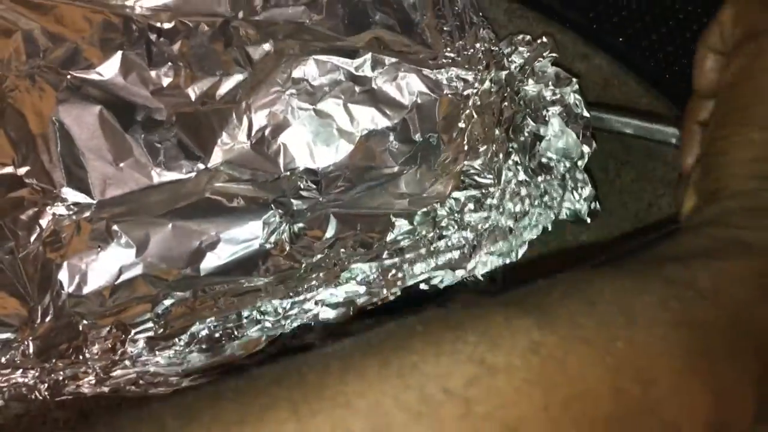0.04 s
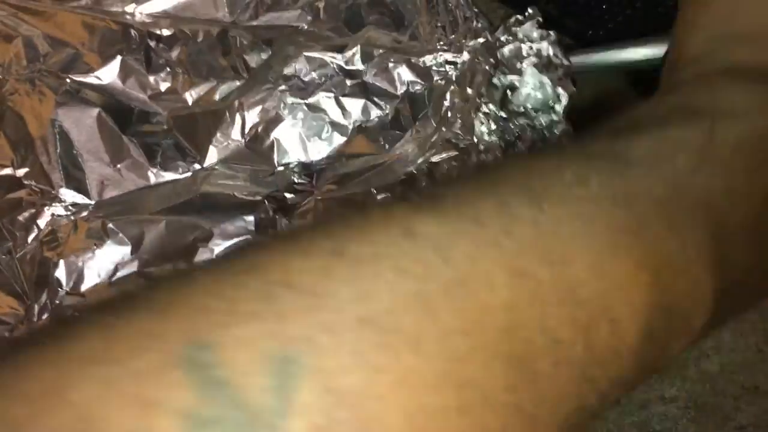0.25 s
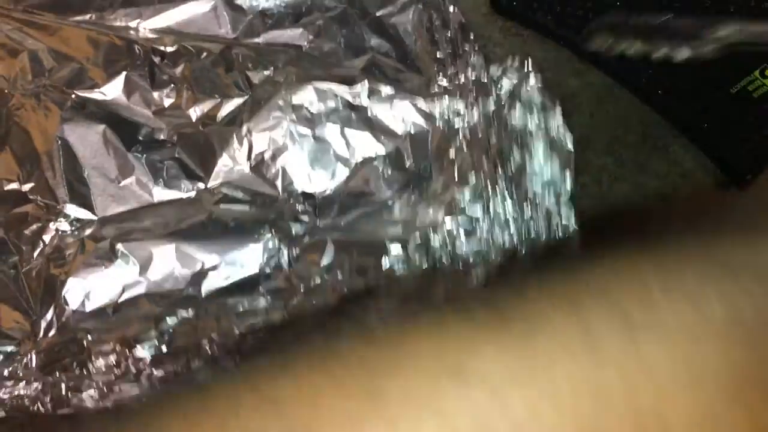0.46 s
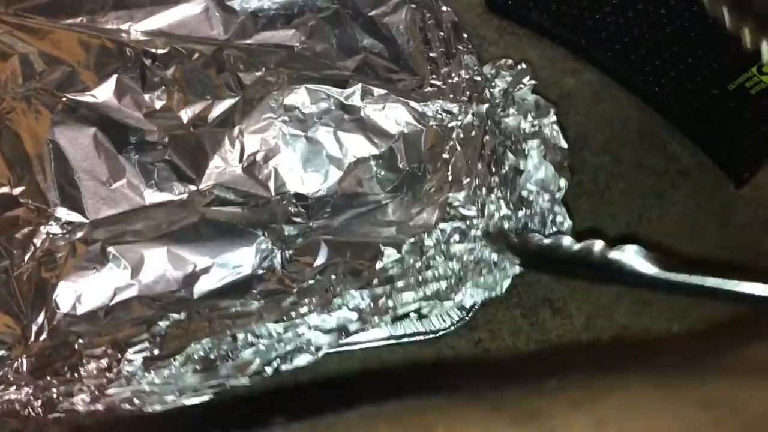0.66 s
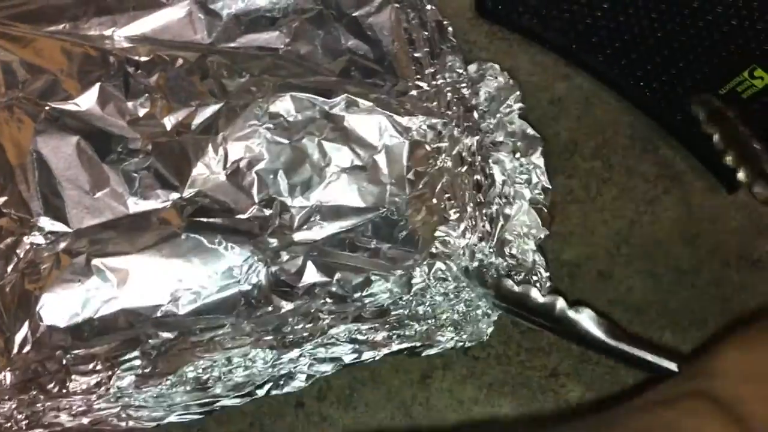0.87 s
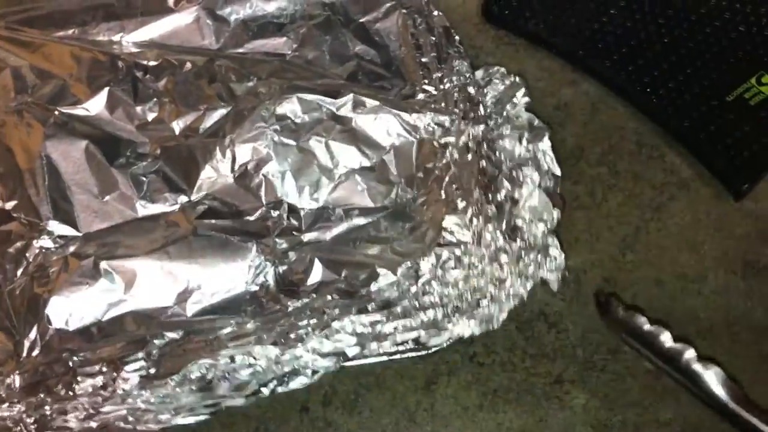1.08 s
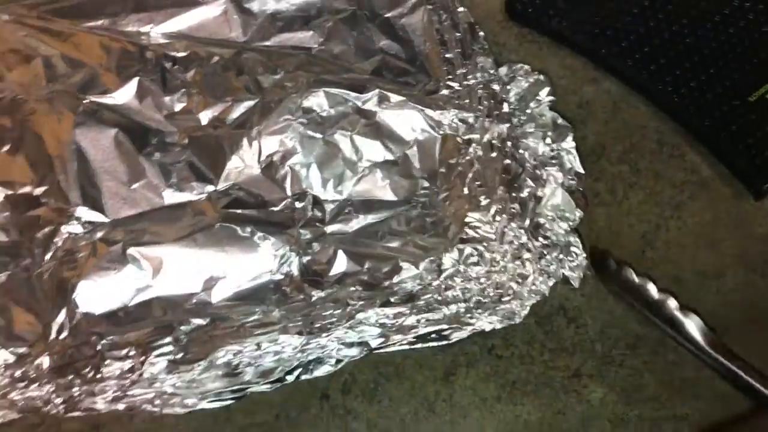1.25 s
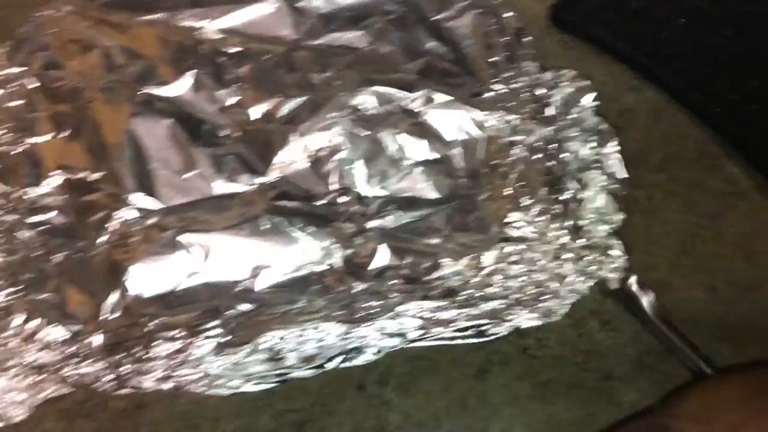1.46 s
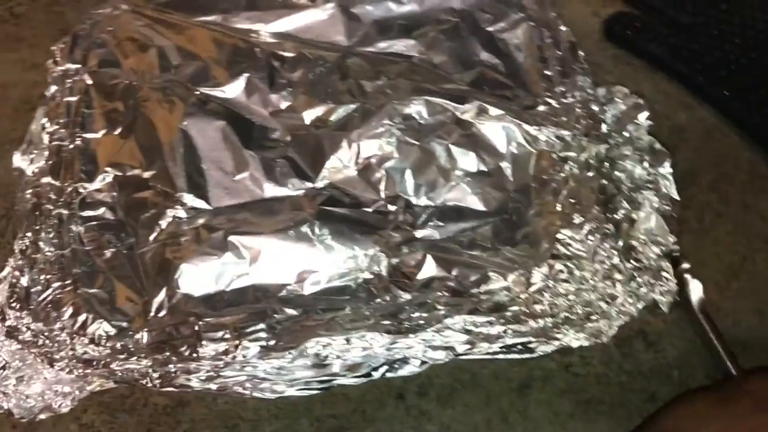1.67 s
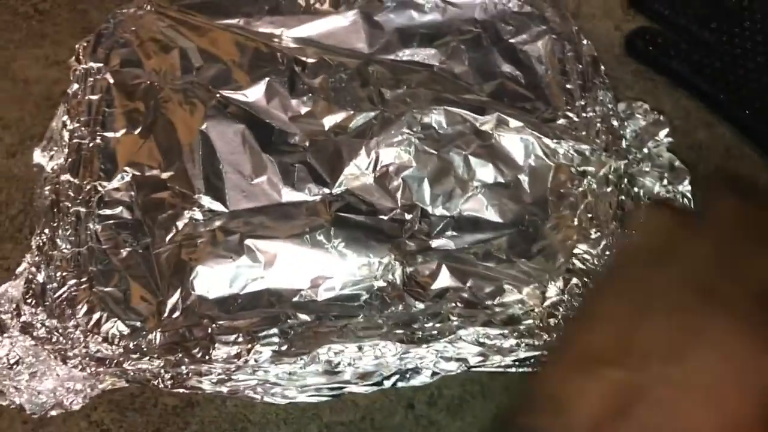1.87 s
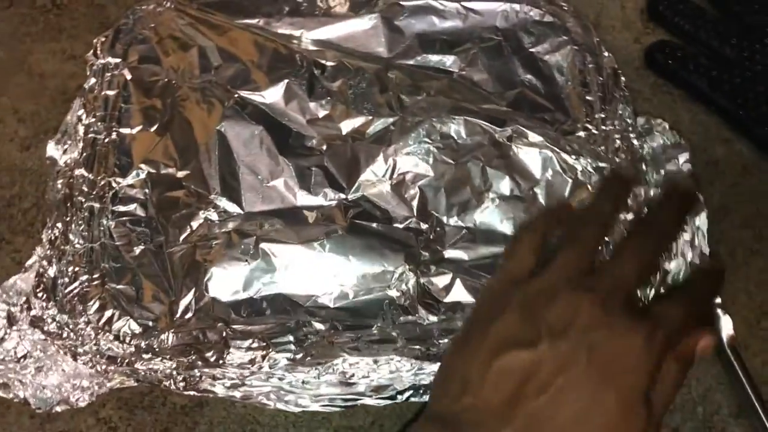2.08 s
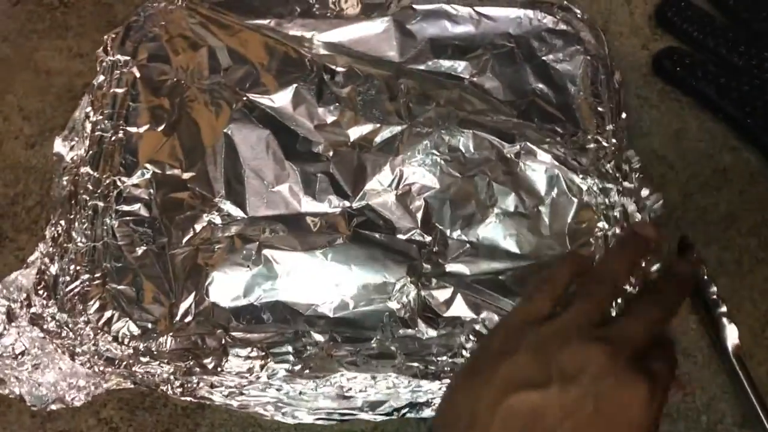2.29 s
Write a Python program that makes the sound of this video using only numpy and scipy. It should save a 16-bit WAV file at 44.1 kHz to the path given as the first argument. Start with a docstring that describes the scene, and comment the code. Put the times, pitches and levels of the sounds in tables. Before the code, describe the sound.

Foil crackling and snapping as it is tucked, followed by a table knife being set down.

```python
"""Tucking foil round a pan

Kitchen counter, close up, one microphone. A table knife tucks aluminium foil under the rim of a thin
foil pan: each push buckles it into tiny crinkles and a few sharper snaps, and the pan gives with a
hollow pop. The knife is set down: it knocks, slides and drops with a short ring. Then fingers press
the foil. Quiet room tone lies behind it all."""
import sys
import numpy as np
from scipy import signal
from scipy.fft import rfft, irfft
from scipy.io import wavfile

SR = 44100
rng = np.random.default_rng(int(sys.argv[2]) if len(sys.argv) > 2 else 0)


def to_wav(s):
    """Save 16-bit WAV."""
    ch = np.atleast_2d(s).T  # columns
    pcm = np.round(np.clip(ch, -1, 1) * 32767)  # PCM
    wavfile.write(sys.argv[1], SR, pcm.astype(np.int16))


N = 102973
T = np.arange(N) / SR

# Pushes on the foil, one list each: t/s, crinkle level/dB, treble above body/dB
PUSHES = [
    [(0, -40, -1), (.028, -42, 1), (.045, -57.5, -19), (.15, -59.5, -3), (.18, -61, -14)],
    [(.21, -54, -16), (.238, -50.5, -1), (.26, -42, -2.5), (.30, -37.5, -1.5), (.318, -43, 7.5),
     (.345, -43, 6), (.40, -44, 8), (.46, -44.5, 7.5), (.479, -44, 5.5), (.49, -57, -16), (.56, -53, -6),
     (.63, -59.5, -14)],
    [(.722, -49, 12), (.75, -39, -4), (.778, -47, -5.5), (.805, -40.5, -4.5), (.83, -54, -14),
     (.848, -54, -10), (.88, -53.5, -12), (.92, -44.5, -9), (.945, -64, -11), (.965, -54, 5)],
    [(1.0, -44.5, -11), (1.018, -35.5, 1), (1.04, -42, 2.5), (1.059, -32.5, 3.5), (1.068, -47, -13),
     (1.10, -53, -8), (1.13, -72, -12), (1.2, -87, -5)],
    [(2.085, -56.5, -1), (2.115, -53, 0), (2.15, -52.5, -2), (2.21, -58, 1), (2.25, -54, 2),
     (2.275, -46, -5.5), (2.30, -53.5, 0), (2.335, -56.5, -5)],
]
# Low cut per push, thinner the looser the foil lies on the pan: f/Hz
PUSH_LOW_CUTS = [149, 200, 478, 380, 220]
# Creases snapping through: t/s, level/dB, length/s, treble above body/dB, facet f/Hz, facet level/dB
SNAPS = [(.0018, -28.5, 0.0024, -3.5, 1340, -28), (0.013, -39, 0.0024, -8, 2440, -41),
         (0.03, -37.5, 0.0021, -7, 4430, -43), (0.21, -55, 0.0023, 3, 6900, -55),
         (0.3238, -31, 0.0066, -5, 1290, -27.5), (.3245, -36, 0.0039, -8, 2440, -30.5),
         (0.5327, -40, 0.00096, 6, 3250, -44), (0.555, -49, 0.0037, -4, 910, -44),
         (0.598, -54, .002, 5, 5000, -60), (0.658, -53, .002, 2, 3180, -53),
         (0.7229, -39, .002, 3, 1110, -49), (0.7299, -38.5, 0.0037, 5, 6570, -35),
         (0.745, -42, .003, 3, 2360, -43), (0.8105, -35.5, 0.0018, 2.5, 1090, -42),
         (.8272, -48, 0.0023, 9, 3500, -52), (0.853, -38.5, .002, 2, 3620, -46),
         (.886, -50, 0.0043, 4, 1420, -48), (0.899, -47, 0.0027, 3, 3160, -44),
         (0.9107, -47, 0.0032, 3, 3400, -41), (0.9678, -32, 0.0039, 4, 1150, -37),
         (0.975, -29.5, .002, 1, 6430, -39), (1.0309, -33, 0.0057, 8.5, 3440, -36),
         (1.0378, -39, 0.0034, 6, 802, -35), (1.09, -51, .002, -3, 6200, -55),
         (1.167, -53, .004, 4.5, 5400, -58), (2.1, -47.5, 0.0051, -12, 960, -43.5),
         (2.11, -52, .002, -3, 3530, -57), (2.162, -43, .003, 4.5, 6140, -52),
         (2.1937, -43, 0.0022, -5, 1270, -50)]
# Spectrum of buckling foil: f/Hz, level/dB
FOIL_SPECTRUM = [(59, -42), (100, -13), (188, -12.5), (355, 0), (438, -4.5), (808, -2), (956, -2.5),
                 (1290, -4), (1840, -7.5), (2470, -5.5), (2990, -9), (3540, -6.5), (4750, -10.5),
                 (6260, -9.5), (7250, -13), (8580, -12), (15500, -21.5)]
# The pan wall gives: t/s, level/dB
PAN_FLEXES = [(.003, -30.5), (.26, -33), (.29, -54), (.324, -31), (.555, -48), (.816, -32.5), (.978, -35.5),
              (2.166, -42.5), (2.275, -51)]
# The pan shifts under the long push: t/s, level/dB
PAN_RUMBLE = [(.2, -64), (.34, -57.5), (.45, -61), (.56, -53.5), (.66, -84)]
# Knife on counter: t/s, thud/dB, crack/dB, chatter length/s, ring/dB, clang/dB, boom/dB
KNOCKS = [(1.4286, -16, -22.5, 0.0041, -45.5, -42, -31), (1.458, -31, -51, 0.00087, -70, -60, -43),
          (1.5681, -23, -33, 0.0018, -53, -47, -37.5), (1.71, -24.5, -17.5, 0.0062, -34, -23, -36),
          (1.7178, -22.5, -36, 0.0017, -45, -46, -22.5), (1.7514, -27, -30, 0.0046, -53, -32.5, -33),
          (1.768, -34.5, -39, .002, -69, -48, -33)]
# The handle drags: t/s, level/dB
SLIDE = [(1.44, -29), (1.47, -39), (1.52, -40.5), (1.555, -52), (1.59, -40), (1.63, -44), (1.675, -44),
         (1.705, -39), (1.72, -59)]
# Modes of pan, blade and counter: f/Hz, level re the hit/dB, t60/s
PAN_MODES = [(247, -5.5, 0.1), (309.5, -7, 0.11), (364.5, -1.5, 0.13), (480, -11.5, .1), (583, -14, 0.092),
             (810, -14.5, 0.11)]
KNIFE_MODES = [(2518, -4, 0.13), (3170, -9, 0.19), (3465, -2, .18), (3760, -1, .16), (4770, 3, 0.19),
               (5280, -7.5, 0.4), (5905, -1, .22), (6330, 2, 0.22), (6345, -9, 0.45), (8750, 2, 0.15),
               (11900, -4, .06), (13900, -6, .11)]
COUNTER_MODES = [(135.2, -13, 0.15), (182.7, -22, 0.48), (302, -4.5, 0.094), (358, -7.5, 0.077),
                 (474.5, -14.5, 0.2), (581.6, -15, 0.17), (920, -21, 0.14), (1193, -26, 0.35),
                 (1482, -26.5, 0.34)]
# Spectra of pan rumble, counter thud, knife crack, handle drag and room tone: f/Hz, level/dB
RUMBLE_SPECTRUM = [(45, -2), (70, -8), (130, -1.5), (250, -8.5), (600, -7), (1500, -34)]
THUD_SPECTRUM = [(90, -19), (140, -3), (200, -4), (300, 3.5), (450, -0.5), (620, 1), (1000, -2.5),
                 (1400, -6.5), (1900, -11.5), (2600, -7), (5000, -23), (15000, -45)]
CRACK_SPECTRUM = [(500, -21), (1900, -20.5), (2600, -2.5), (3600, 1), (4500, -3.5), (6100, 3), (7300, -4.5),
                  (8800, -1), (10000, -7), (12000, -3), (15500, -7)]
SLIDE_SPECTRUM = [(35, -45), (60, -22), (156, -1), (602, 2), (1630, -9.5), (1910, -11.5), (2330, -14),
                  (4330, -27), (5900, -20.5), (8230, -39), (12000, -35), (15600, -68), (22000, -120)]
ROOM_TONE_SPECTRUM = [(15, -28), (25, -11), (75, -1.5), (173, -11), (209, -14.5), (289, -15), (552, -23.5),
                      (1570, -23), (2490, -27), (10400, -33.5), (11500, -36), (15500, -35)]
# Decay of the kitchen: f/Hz, t60/s
ROOM_T60 = [(100, 0.37), (500, 0.48), (2000, 0.44), (5000, 0.4), (10000, 0.31), (16000, 0.23)]

CLICKS_PER_S, CLICK_SPREAD_DB, CLUMP_DB, CLUMPS_PER_S = 6000, 3.5, 1.5, 150
TREBLE_HZ, SNAP_LOW_CUT_HZ, TOP_CUT_HZ = 3150, 555, 15800
SNAP_RELEASE_S, FACET_RELEASE_S, PAN_ATTACK_S = 0.0021, 0.0043, 0.0031
THUD_RELEASE_S, CRACK_RELEASE_S, STRIKE_ATTACK_S = 0.0064, 0.0027, 0.00049
CLANG_HZ, CLANG_Q = 3590, 5.4   # the blade
BOOM_HZ, BOOM_DECAY_S = 86.5, 0.0096   # the counter top gives under a knock
FOIL_ROOM_DB, KNIFE_ROOM_DB, ROOM_TONE_DB = -12.5, -11, -59.5
EARLY_DB, EARLY_DECAY_S, TAIL_RISE_S = -6.5, .008, 0.0088
MOVES_PER_S = 2.478   # how fast the reflections change as the hand moves


def foil():
    """Crinkles come in clumps under each push; snaps are tight bursts of the same buckling."""
    crinkles = unit(clicks() * amp(CLUMP_DB * drift(CLUMPS_PER_S)))
    noise = rng.standard_normal(N)
    rustle, snaps = np.zeros((2, N))
    for push, low_cut_hz in zip(PUSHES, PUSH_LOW_CUTS):
        times, db, treble_db = np.transpose(push)
        pressed = crinkles * level_curve(np.c_[times, db])
        pressed = brighten(pressed, np.interp(T, times, treble_db))
        rustle += cut(pressed, low_cut_hz, "high", order=2)
    for start, db, length, treble_db, _, _ in SNAPS:
        snaps += brighten(noise * amp(db) * burst(start, length, SNAP_RELEASE_S), treble_db)
    snaps = cut(snaps, SNAP_LOW_CUT_HZ, "high", order=2)
    return np.sqrt(2) * colour(rustle + snaps, FOIL_SPECTRUM)


def facets():
    """Every snap briefly rings the small flat of foil beside its crease."""
    return sum(amp(db) * burst(start, length, FACET_RELEASE_S) * np.sin(2 * np.pi * hz * (T - start))
               for start, _, length, _, hz, db in SNAPS)


def pan():
    """The thin wall gives with hollow pops, and the pan rumbles as it shifts."""
    pops = ring(PAN_FLEXES, PAN_MODES, PAN_ATTACK_S)
    rumble = colour(rng.standard_normal(N) * level_curve(PAN_RUMBLE), RUMBLE_SPECTRUM)
    return pops + rumble


def knife():
    """Each knock thuds in the counter, chatters and rings the steel; between knocks the handle drags."""
    thud, crack, clang, boom = np.zeros((4, N))
    counter_hits, blade_hits = [], []
    for start, thud_db, crack_db, length, ring_db, clang_db, boom_db in KNOCKS:
        chatter = burst(start, length, CRACK_RELEASE_S)
        thud += amp(thud_db) * burst(start, 0, THUD_RELEASE_S)
        crack += amp(crack_db) * chatter
        clang += amp(clang_db) * chatter
        boom += amp(boom_db) * burst(start, 0, BOOM_DECAY_S) * np.sin(2 * np.pi * BOOM_HZ * (T - start))
        counter_hits.append((start, thud_db))
        blade_hits.append((start, ring_db))
    noise = rng.standard_normal((3, N))
    blows = colour(thud * noise[0], THUD_SPECTRUM) + colour(crack * noise[1], CRACK_SPECTRUM)
    blows += clang * resonance(noise[2], CLANG_HZ, CLANG_Q)
    blows += cut(boom, hz=68, kind="high", order=4)
    counter_ring = ring(counter_hits, COUNTER_MODES, STRIKE_ATTACK_S)
    blade_ring = ring(blade_hits, KNIFE_MODES, STRIKE_ATTACK_S)
    drag = colour(clicks() * level_curve(SLIDE), SLIDE_SPECTRUM)
    return kitchen(blows + drag, KNIFE_ROOM_DB) + counter_ring + blade_ring


def kitchen(direct, tail_db):
    """Direct sound at the microphone, plus two patterns of reflections the source moves between."""
    angle = 2 * np.pi * MOVES_PER_S * T
    first = convolve(direct * np.cos(angle), reflections(tail_db))
    second = convolve(direct * np.sin(angle), reflections(tail_db))
    return direct + first + second


def reflections(tail_db):
    """Close reflections off counter and pan, then a kitchen tail that dies faster in the treble."""
    t = T[:SR // 2]
    white = rfft(rng.standard_normal(len(t)))
    hz = np.fft.rfftfreq(len(t), 1 / SR)
    edges = np.geomspace(30, 20000, 15)
    tail = np.zeros(len(t))
    for low, high in zip(edges, edges[1:]):
        band = irfft(white * (hz >= low) * (hz < high), len(t))
        tail += band * amp(-60 * t / at_hz(ROOM_T60, np.sqrt(low * high)))
    tail *= np.minimum(t / TAIL_RISE_S, 1)
    early = rng.standard_normal(len(t)) * np.exp(-t / EARLY_DECAY_S) * (t > .001)
    return (amp(tail_db) * unit(tail) + amp(EARLY_DB) * unit(early)) / np.sqrt(len(t))


def room_tone():
    """The kitchen's quiet, steady noise, mostly bass."""
    return amp(ROOM_TONE_DB) * colour(rng.standard_normal(N), ROOM_TONE_SPECTRUM)


def clicks():
    """A dense stream of tiny clicks of uneven size, rms 1."""
    sizes = amp(CLICK_SPREAD_DB * np.minimum(rng.exponential(1, N), 4))
    signs = rng.choice([-1, 1], N)
    return unit(sizes * signs * (rng.random(N) < CLICKS_PER_S / SR))


def ring(hits, modes, attack_s):
    """Each hit (t/s, level/dB) rings all the modes, each with a slightly different strength."""
    out, t = np.zeros(N + SR), T[:SR // 2]
    tones = np.array([amp(db - 60 * t / t60) * np.cos(2 * np.pi * hz * t) for hz, db, t60 in modes])
    tones *= 1 - np.exp(-t / attack_s)
    for start, db in hits:
        i = int(start * SR)
        strengths = amp(db + rng.normal(0, 1, len(modes))) * rng.choice([-1, 1], len(modes))
        out[i:i + len(t)] += strengths @ tones
    return out[:N]


def burst(start, length, release):
    """Envelope: instant attack, hold, exponential release."""
    return (T >= start) * np.exp(-np.clip((T - start - length) / release, 0, 50))


def level_curve(points):
    """Points (t/s, level/dB) as gain, silent outside their span."""
    return amp(np.interp(T, *np.transpose(points), left=-200, right=-200))


def drift(per_s):
    """Glide between random values of spread 1."""
    return np.interp(T * per_s, np.arange(N), rng.standard_normal(N))


def colour(x, spectrum, size=4096):
    """Causal filter of unit power with the given spectrum, falling away below its first point."""
    hz = np.arange(size // 2 + 1) * SR / size
    gain = amp(at_hz(spectrum, hz)) * np.clip(hz / spectrum[0][0], .1, 1) ** 2
    cepstrum = irfft(np.log(unit(gain)))
    cepstrum[1:size // 2] *= 2   # fold to minimum phase
    cepstrum[size // 2 + 1:] = 0
    return convolve(x, irfft(np.exp(rfft(cepstrum))))


def brighten(x, treble_db):
    """Raise or lower the treble against the body."""
    return cut(x, TREBLE_HZ, "low") + cut(x * amp(treble_db), TREBLE_HZ, "high")


def resonance(x, hz, q):
    """One resonant peak, scaled to rms 1."""
    return unit(signal.lfilter(*signal.iirpeak(hz, q, fs=SR), x))


def cut(x, hz, kind, order=3):
    """Butterworth low- or high-pass."""
    return signal.sosfilt(signal.butter(order, hz, kind, fs=SR, output="sos"), x)


def convolve(x, response):
    """Pass a sound through an impulse response."""
    return signal.fftconvolve(x, response)[:N]


def at_hz(points, hz):
    """Read a table on a log-frequency axis."""
    f, value = np.transpose(points)
    return np.interp(np.log(np.maximum(hz, 1)), np.log(f), value)


def amp(db):
    """Decibels to gain."""
    return 10 ** (np.asarray(db) / 20)


def unit(x):
    """Scale to rms 1."""
    return x / np.sqrt(np.mean(x ** 2) + 1e-20)


def scene():
    """Foil, pan and knife close to the microphone, room tone behind; mono."""
    background = room_tone()
    tucking = kitchen(pan() + foil() + facets(), FOIL_ROOM_DB)
    return (tucking + knife() + background)[None]


def record(dry):
    """A steep top cut on the microphone channel."""
    return signal.sosfilt(signal.ellip(12, .2, 80, TOP_CUT_HZ, fs=SR, output="sos"), dry)


dry = scene()
out = record(dry)
to_wav(out)
```